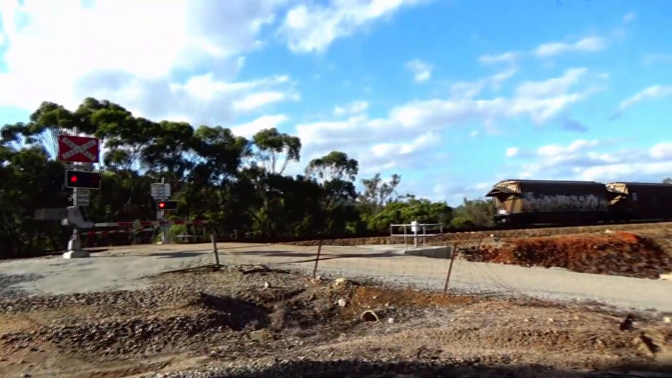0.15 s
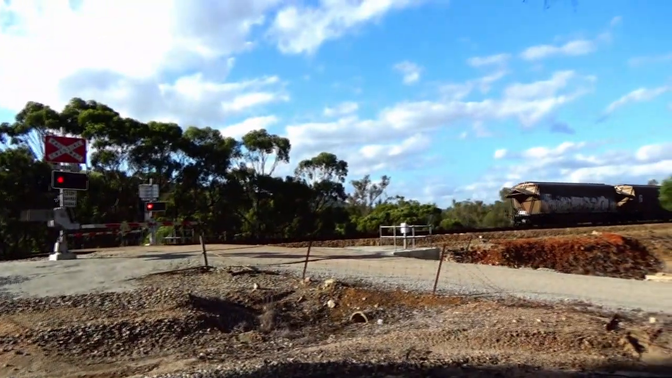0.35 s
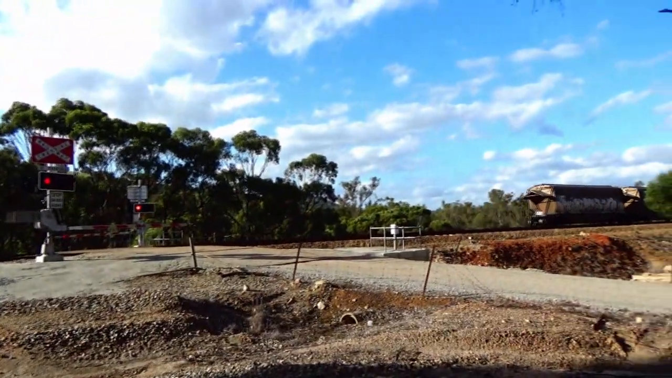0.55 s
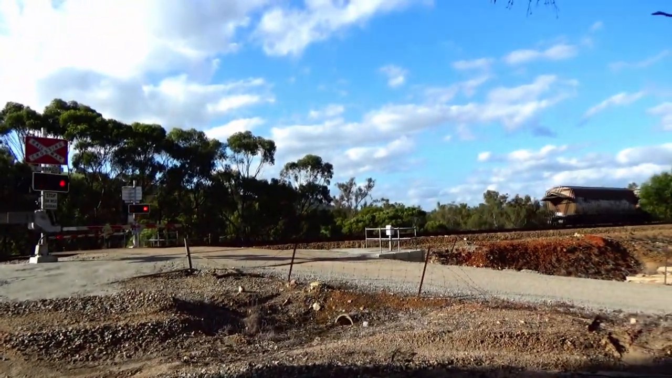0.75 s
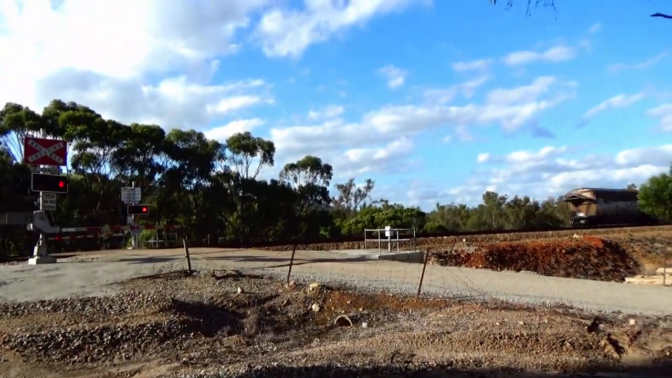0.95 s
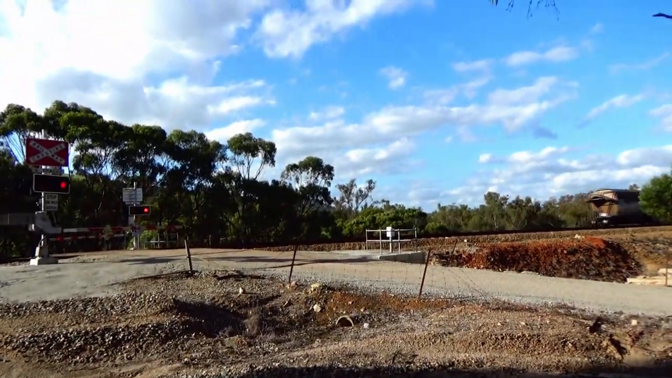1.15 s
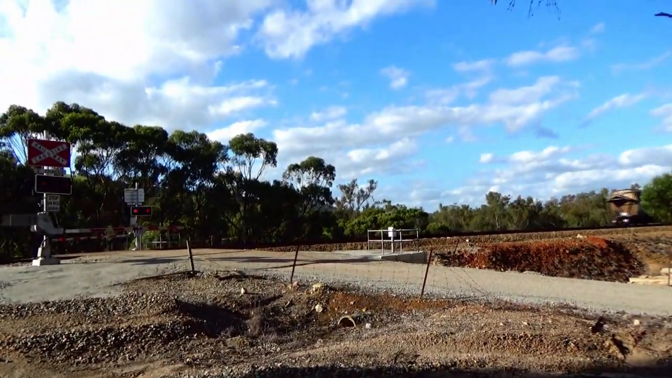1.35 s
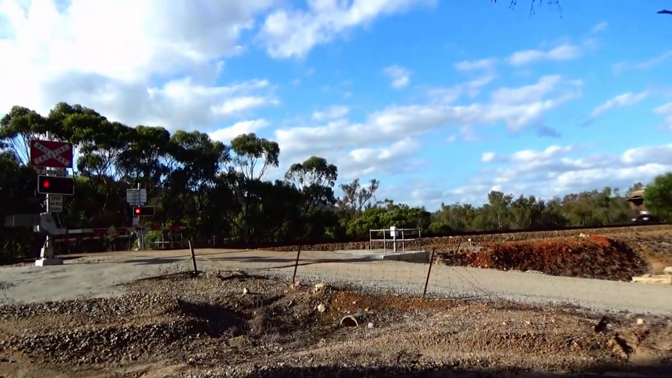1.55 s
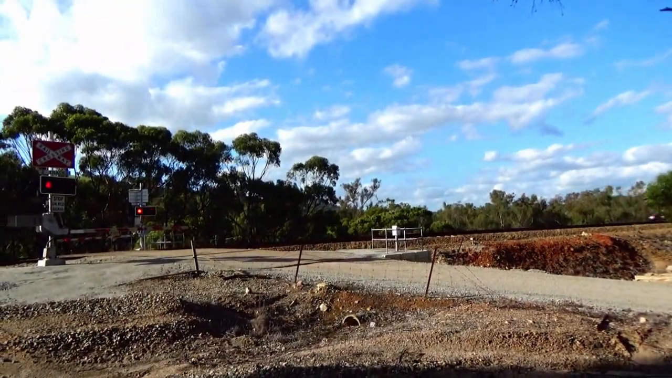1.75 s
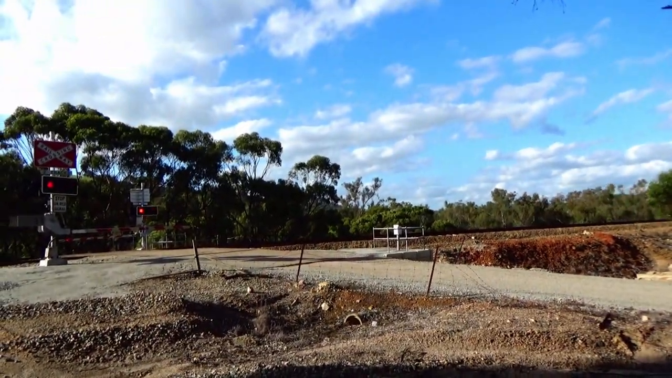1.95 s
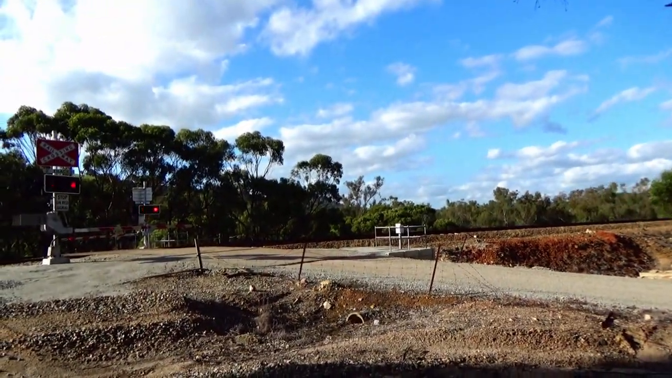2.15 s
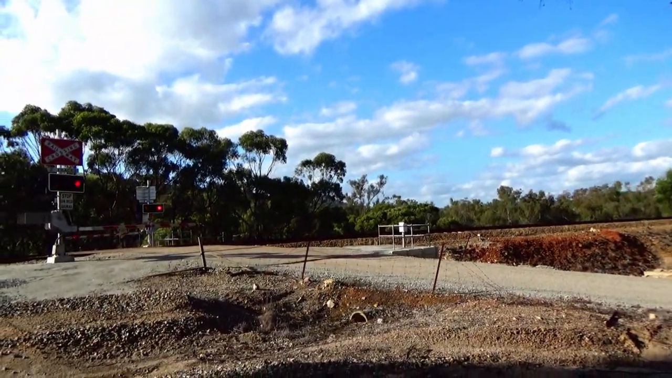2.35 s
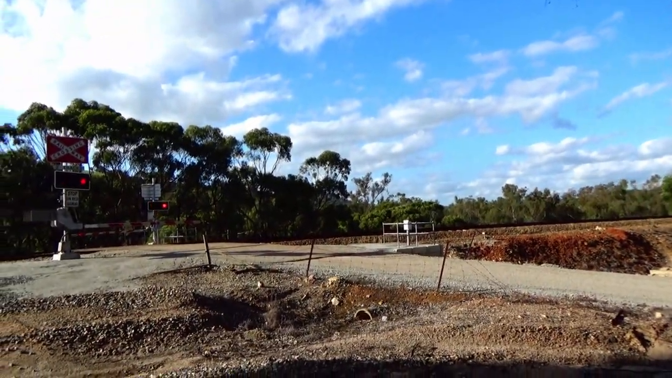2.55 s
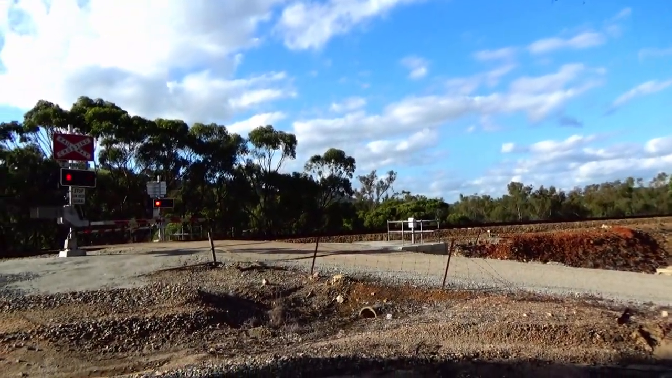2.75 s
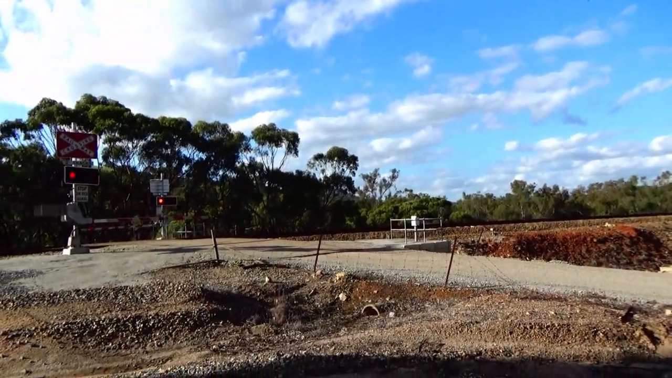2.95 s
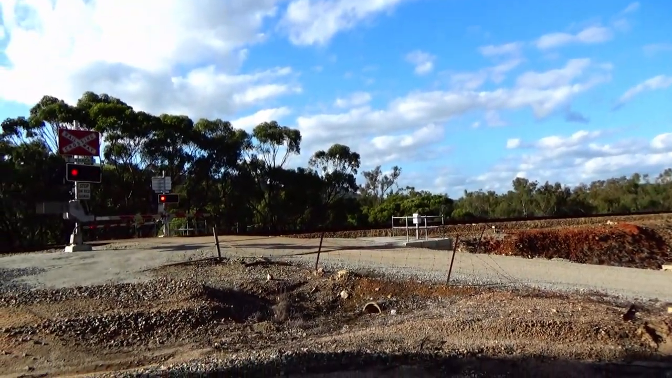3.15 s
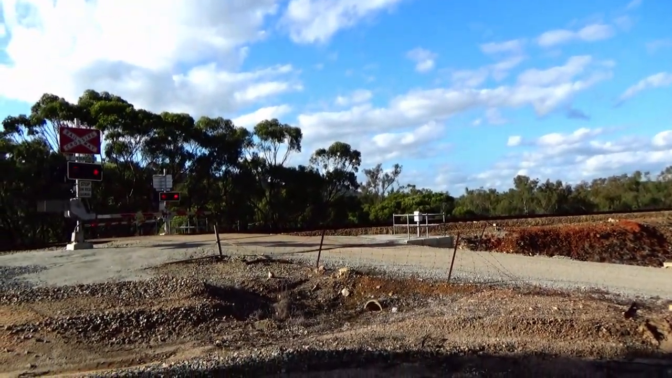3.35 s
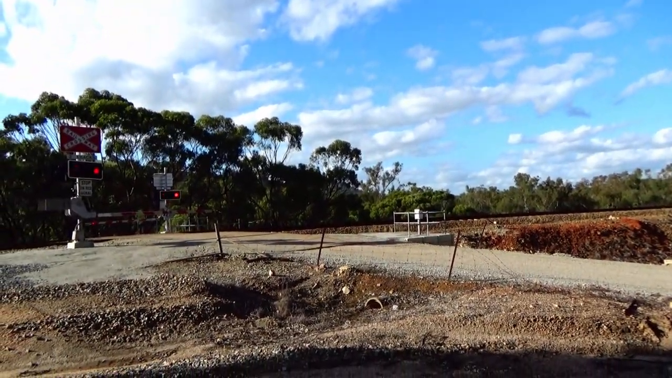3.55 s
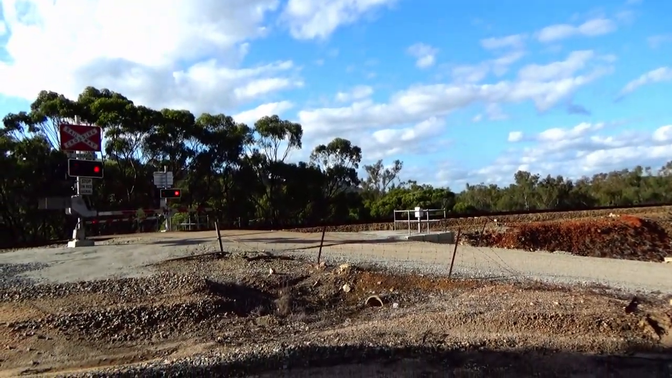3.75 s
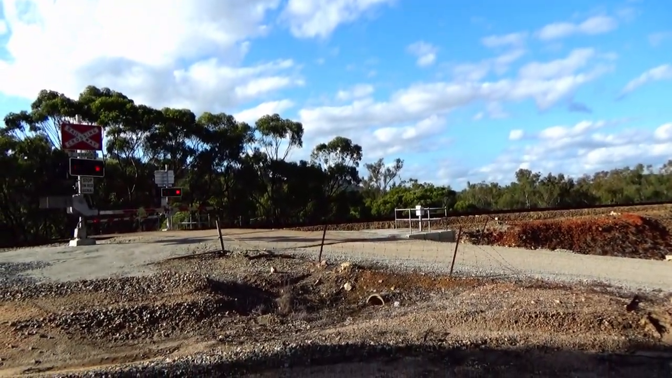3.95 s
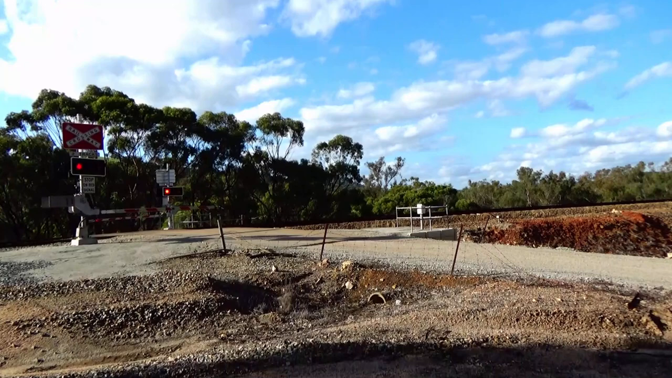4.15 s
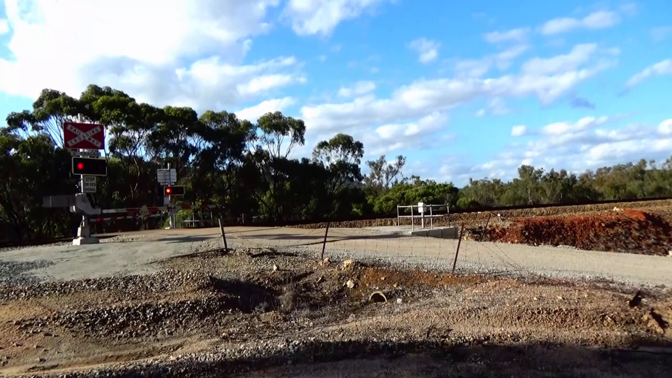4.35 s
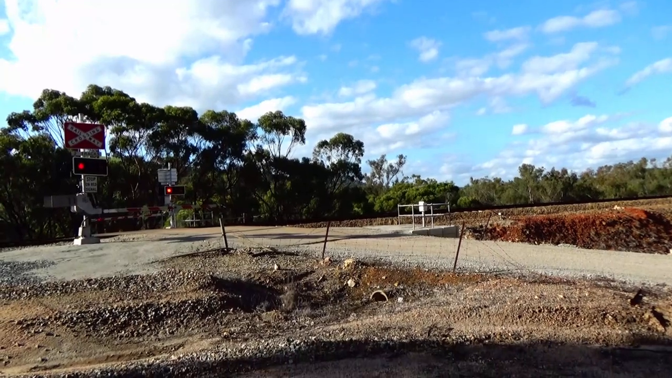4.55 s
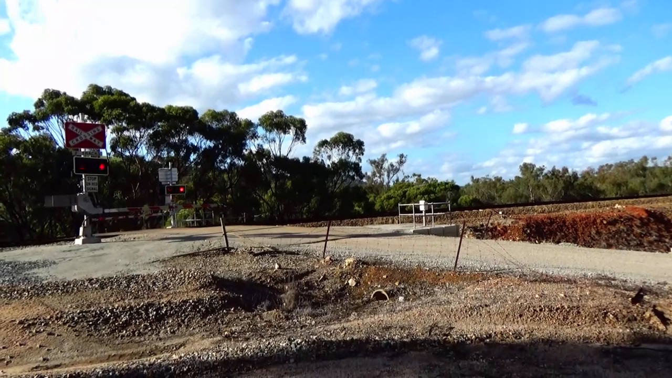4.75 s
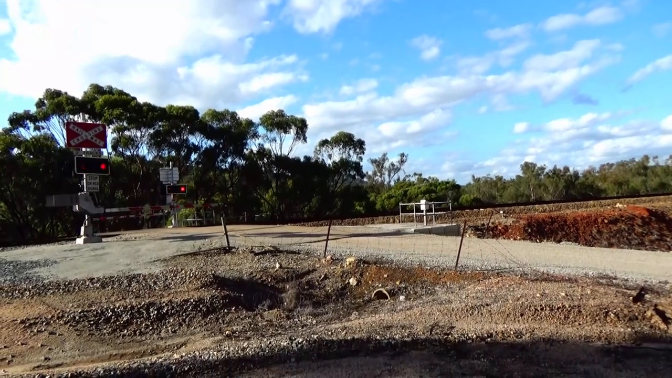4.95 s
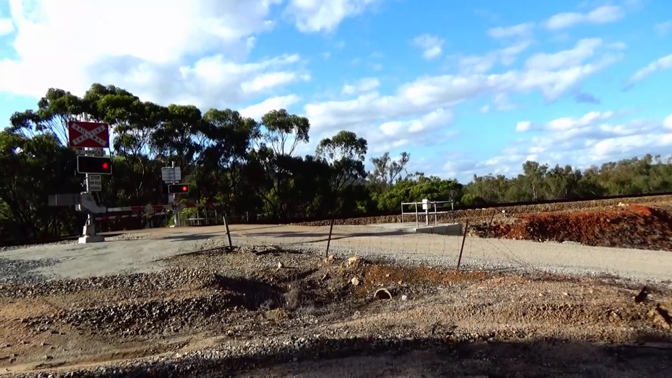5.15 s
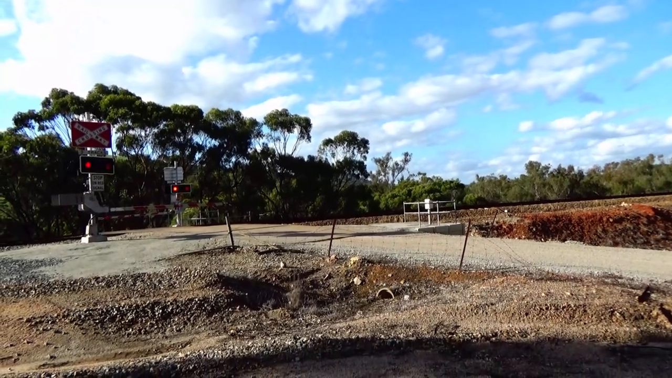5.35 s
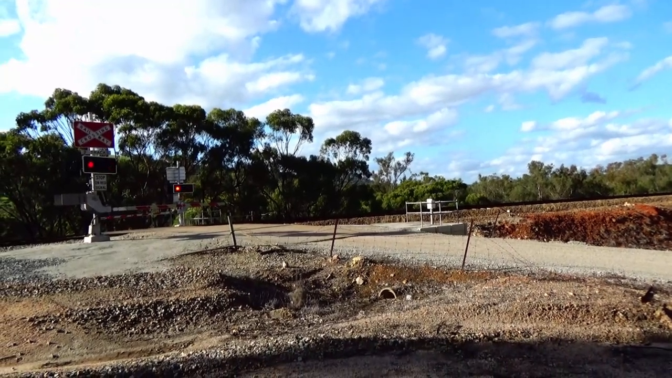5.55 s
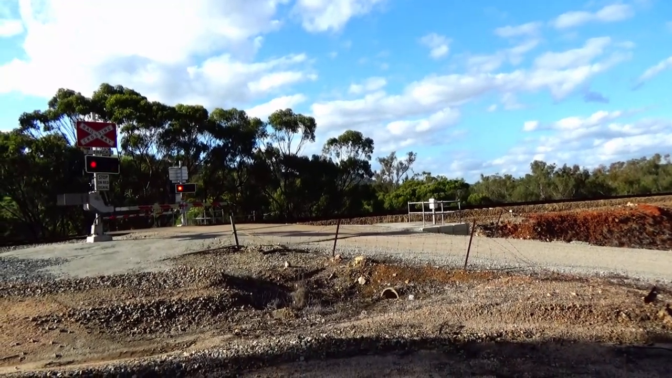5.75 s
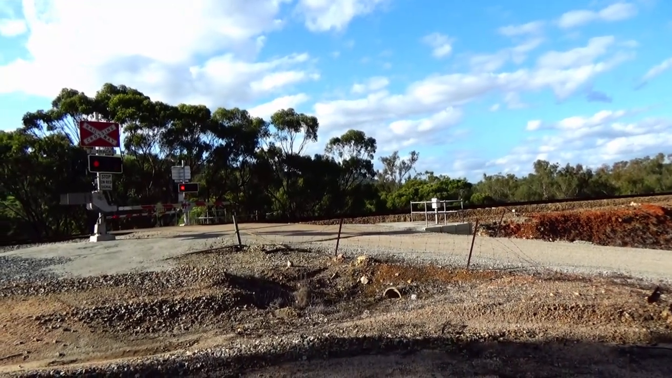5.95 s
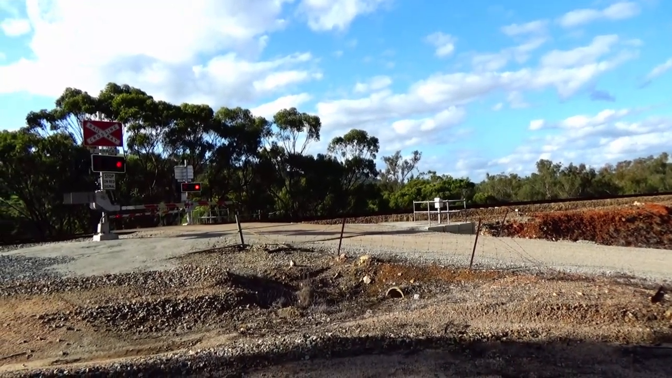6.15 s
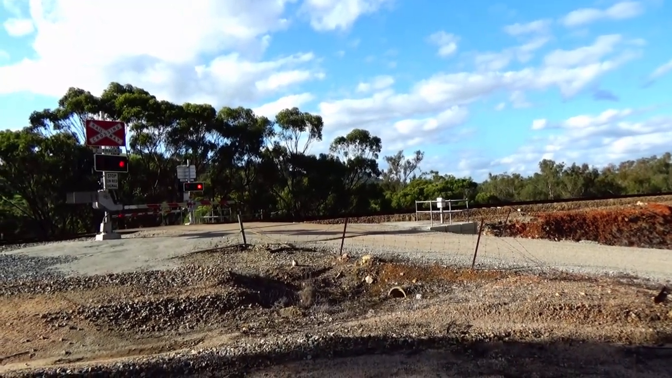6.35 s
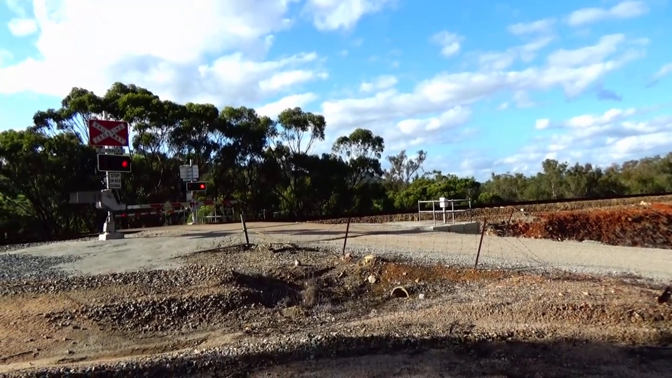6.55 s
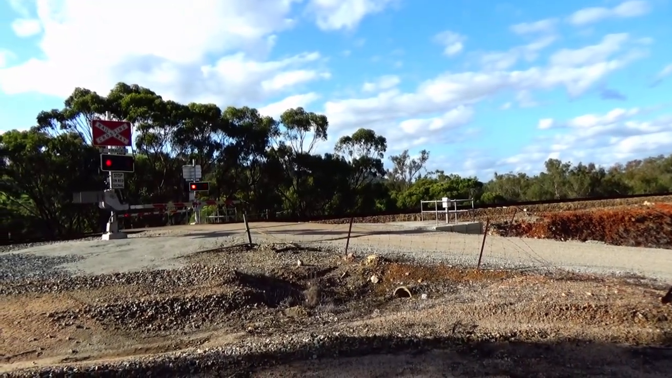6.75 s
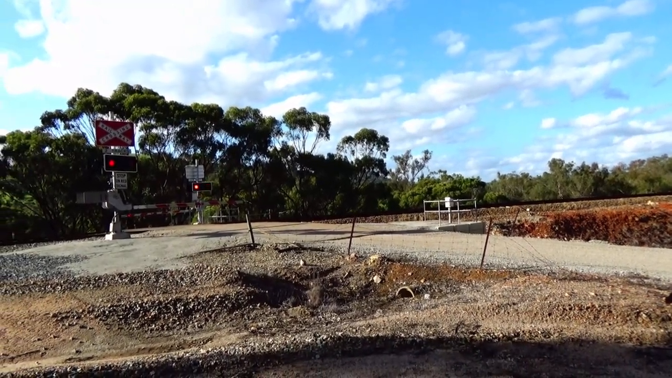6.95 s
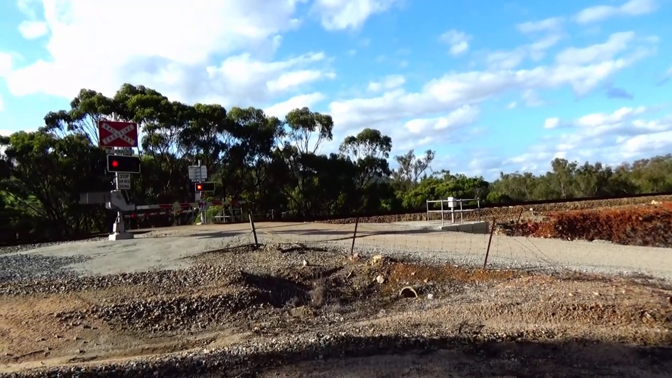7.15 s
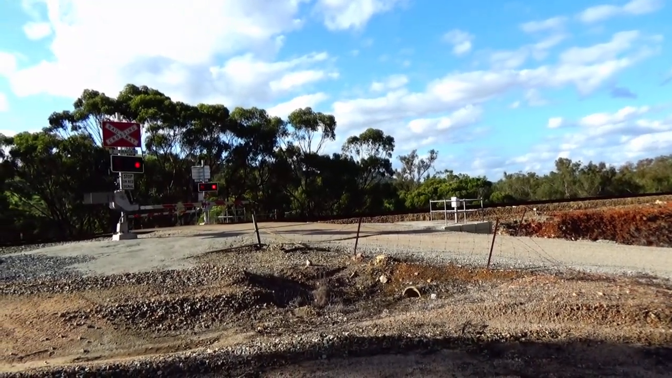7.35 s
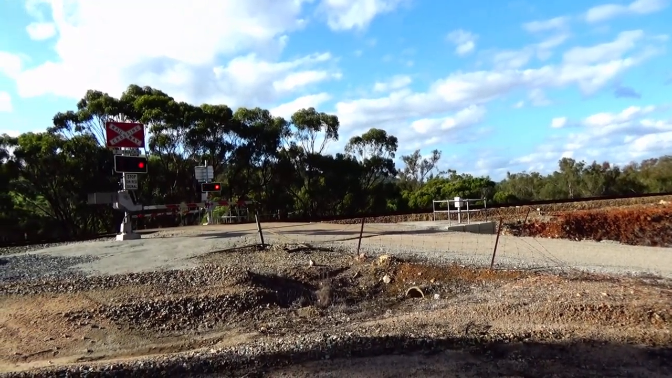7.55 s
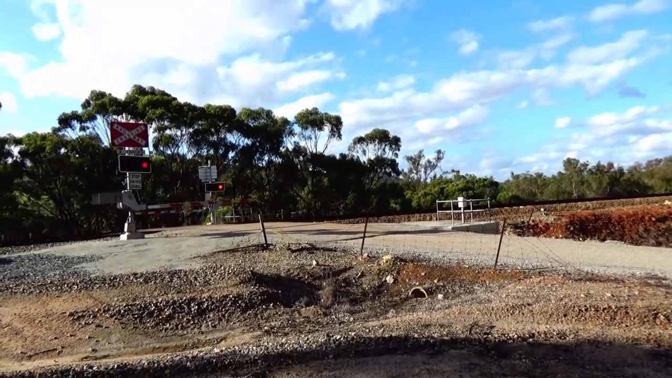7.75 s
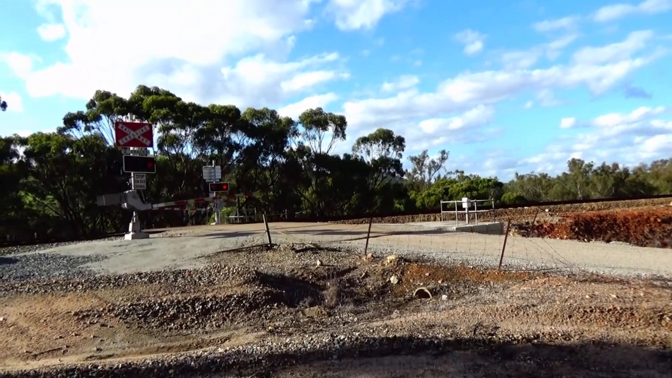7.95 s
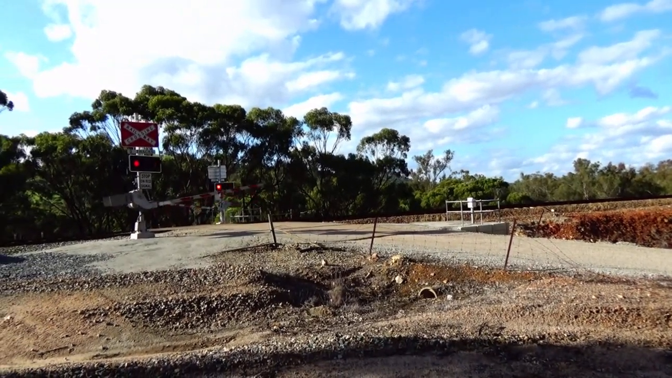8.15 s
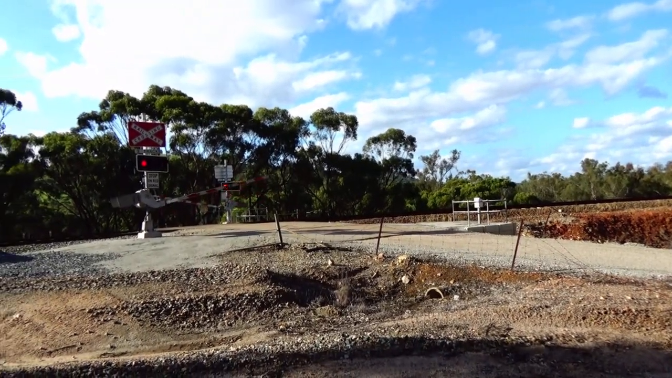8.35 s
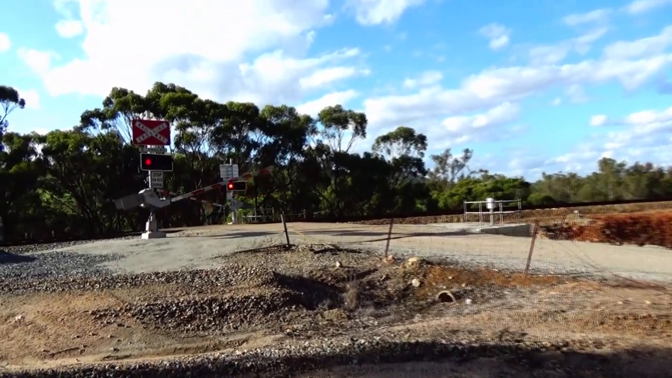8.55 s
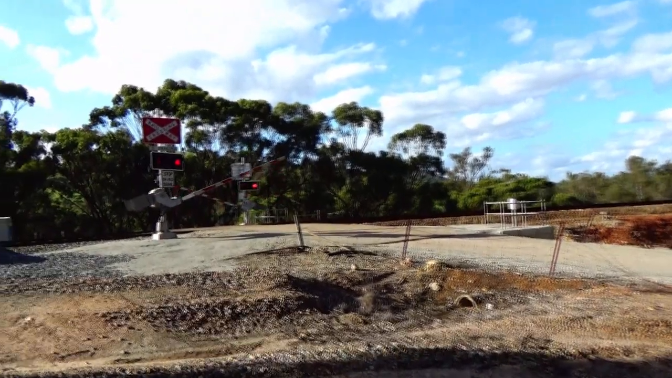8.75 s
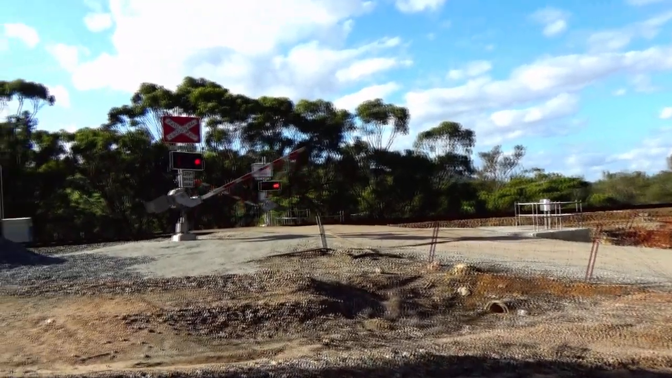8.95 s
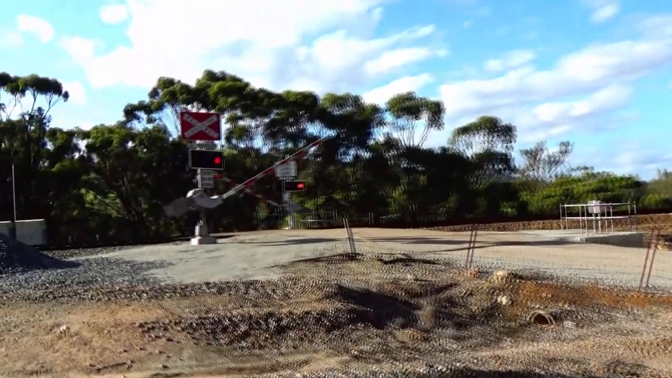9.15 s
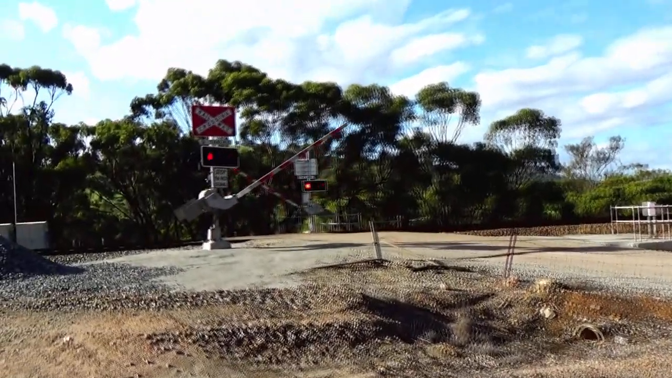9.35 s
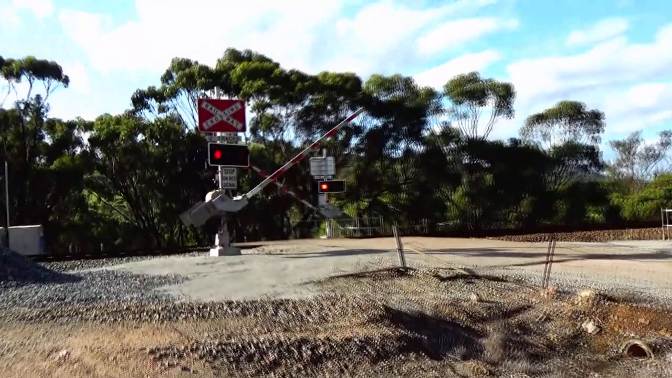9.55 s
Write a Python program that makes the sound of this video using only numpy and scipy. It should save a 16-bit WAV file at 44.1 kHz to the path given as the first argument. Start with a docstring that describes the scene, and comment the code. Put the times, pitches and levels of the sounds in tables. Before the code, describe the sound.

A departing train starts close and harsh, with dense metallic hiss, wheel ring and many thin squeaks. The hiss falls away as the wagons disappear, while two high squeals flare irregularly and the rails keep singing, ever fainter, over low rumble and hum. A small double tick comes midway, with slight wind puffs later. Finally a sharp steel clank and scattered ticks of the rising boom stand out against the quiet open countryside, heard in stereo from the roadside.

```python
"""A freight train's last wagons roll away from a country level crossing on a curve: drifting shaped noise
gives rumble, wheel ring in broad bands, a whine lingering in the rails and flange hiss.
Wavering sines make two lasting squeals, short squeaks and a low hum.
Later the crossing boom clanks free and ticks as it lifts: noise bursts through gear resonances.
Wind noise and still air lie beneath."""
import sys
import numpy as np
from scipy import signal
from scipy.io import wavfile
from scipy.ndimage import uniform_filter1d

SR = 44100
rng = np.random.default_rng(int(sys.argv[2]) if len(sys.argv) > 2 else 0)


def to_wav(s):
    """Save 16-bit WAV."""
    ch = np.atleast_2d(s).T  # columns
    pcm = np.round(np.clip(ch, -1, 1) * 32767)  # PCM
    wavfile.write(sys.argv[1], SR, pcm.astype(np.int16))


N = 422911
FRAME, HOP = 2048, 512  # samples
SIDE = np.array([[.5], [-.5]])  # left and right halves of a difference

# direction of the train: time_s, left_minus_right_db
BEARING = [(0, -1.5), (2.1, -3.9), (6.1, -4.5), (6.6, -3), (9.1, -3.5), (9.59, -.5)]
# phase between the microphone ports: freq_hz, left_lead_rad
LEAD = [(0, -0.53), (1030, 0.43), (1290, 0.99), (1890, 0.77), (2840, 0.69), (3100, 0.65), (8610, 0.097),
        (11400, -0.086), (15200, -0.0)]
# how far each frequency follows a left-right tilt: freq_hz, share
LEAN = [(100, 0), (400, 0.19), (1000, 0.44), (4400, 0.76), (8000, 0.73), (14000, 0)]


def gain_of(db):
    """Decibels to gain."""
    return 10 ** (np.asarray(db) / 20)


def evened(x):
    """Scales to rms 1."""
    return x / np.sqrt(np.mean(x ** 2) + 1e-20)


def read(points, hz):
    """Reads a table on a log-frequency axis."""
    f, value = np.transpose(points)
    return np.interp(np.log(hz + 1), np.log(f + 1), value)


def add(mix, start_s, sound):
    """Adds a sound into the mix at a time."""
    part = mix[..., round(start_s * SR):][..., :sound.shape[-1]]
    part += sound[..., :part.shape[-1]]


def unit_curve(points, hz):
    """Power spectrum drawn by a dB table, total power 1."""
    power = gain_of(2 * read(points, hz))
    return power / power.sum()


def humps(modes, hz):
    """Power spectrum of steep resonances, total power 1."""
    power = sum(gain_of(2 * db) / (1 + (2 * (hz - f) / width) ** 2) ** 2 for f, width, db in modes)
    return power / power.sum()


def drift(count, smooth_s):
    """Twice-smoothed noise of rms 1."""
    size = max(int(smooth_s * SR), 1)
    once = uniform_filter1d(rng.standard_normal(count), size)
    return evened(uniform_filter1d(once, size))


def ring(x, hz, width_hz):
    """One steep resonance of peak gain 1: a peak filter run twice."""
    b, a = signal.iirpeak(hz, hz / width_hz, SR)
    return signal.lfilter(b, a, signal.lfilter(b, a, x))


def ports(x, hz, tilt_db):
    """Left and right copies of one complex tone, as the two microphone ports hear it."""
    phase = np.exp(1j * SIDE * read(LEAD, hz))
    return (x * phase * gain_of(SIDE * tilt_db * read(LEAN, hz))).real


def train_power(t, hz):
    """Rough wheels on rough rails: four noise layers fading at their own pace, with random drifts."""
    # receding train, before drifts: time_s, rumble_db, wheel_ring_db, rail_whine_db, flange_hiss_db
    train = [(0.0, -27, -18.5, -19, -16), (0.6, -28.5, -20, -19.5, -19), (0.96, -30.5, -21.5, -15, -22),
             (1.28, -30.5, -25, -15, -29.5), (1.7, -32.5, -26, -17, -33), (2.2, -31.5, -26.5, -19, -34.5),
             (3.0, -31.5, -27, -21.5, -36), (3.76, -31, -27, -23, -38), (4.5, -31, -28.5, -23, -39.5),
             (5.1, -33, -30, -28, -42), (6.14, -35, -33.5, -31.5, -45.5), (6.8, -35.5, -35, -34.5, -47),
             (7.6, -37.5, -35, -34, -47.5), (8.0, -37, -36, -37.5, -47.5), (9.0, -36.5, -39.5, -41, -51),
             (9.59, -36, -41.5, -42, -51.5)]
    # rolling rumble: freq_hz, density_db_per_hz
    rumble = [(88, -41), (150, -9.5), (221, 0.5), (306, -5), (416, -0.5), (520, -6.5), (668, -2), (900, 0),
              (1500, -6), (1950, -14), (3300, -120)]
    # broad bands of crowded wheel modes: freq_hz, width_hz, level_db
    wheel_ring = [(1997, 390, -3), (2710, 274, -3), (3690, 520, -4.5), (4670, 530, 0.5), (1560, 480, -11.5),
                  (3050, 1900, -9.5)]
    # whine in the rails: freq_hz, width_hz, level_db
    whine = [(5870, 447, 3), (5400, 110, -4), (5590, 180, 3.5), (5880, 1600, -15.5)]
    # flange hiss in sight: freq_hz, width_hz, level_db
    hiss = [(6840, 400, 0), (7840, 550, -2), (8730, 470, -2.5), (9620, 420, -4), (10090, 220, -6),
            (10200, 350, -13), (10860, 380, -5.5), (11600, 400, -8), (12170, 410, -9.5), (13650, 280, -17),
            (7340, 1900, -6), (9120, 500, -12), (12950, 870, -21), (13900, 1100, -42)]
    # hiss scattered by trees and banks, bands smeared: freq_hz, density_db_per_hz
    far_hiss = [(3760, -33), (6400, -4.5), (6550, -3), (8430, -9), (11000, -15.5), (12300, -11.5),
                (14000, -28.5)]
    hidden_s, hiding_s = 1.1, .6  # last wagon starts to go out of sight; time constant

    s, *columns = np.transpose(train)
    *levels_db, hiss_db = [np.interp(t, s, c) for c in columns]
    shapes = [unit_curve(rumble, hz), humps(wheel_ring, hz), humps(whine, hz)]
    power = sum(np.outer(shape, gain_of(2 * db)) for shape, db in zip(shapes, levels_db))
    seen = np.minimum(np.exp((hidden_s - t) / hiding_s), 1)
    hiss_shape = np.outer(humps(hiss, hz), seen) + np.outer(unit_curve(far_hiss, hz), 1 - seen)
    power += hiss_shape * gain_of(2 * hiss_db)

    # groups of modes swell and die: smoothed over 12 bins, 6 frames
    patches = uniform_filter1d(rng.standard_normal(power.shape), 12, 0)
    patches = evened(uniform_filter1d(patches, 6, 1))
    # single sharp modes ring on: smoothed over 20 frames
    streaks = evened(uniform_filter1d(rng.standard_normal(power.shape), 20, 1))
    # the wagons shake as one
    jolts = evened(uniform_filter1d(rng.standard_normal(len(t)), 3))
    return power * gain_of(2 * (0.61 * patches + 2.29 * streaks + 0.41 * jolts))


def tone(t, hz, db, waver_hz, flutter_db, smooth_s):
    """A self-excited mode: a sine whose pitch wavers and whose level flutters."""
    turns = np.cumsum(hz + waver_hz * drift(len(t), smooth_s)) / SR + rng.random()
    level = np.sqrt(2) * gain_of(db + flutter_db * drift(len(t), smooth_s))
    tilt_db = np.interp(t, *np.transpose(BEARING))
    return ports(level * np.exp(2j * np.pi * turns), np.mean(hz), tilt_db)


def lasting_squeals():
    """Two wheel modes that sing faintly, flare up and settle in pitch."""
    # the two modes: settled_hz, early_excess_hz, settling_s, first_heard_s
    wheels = [(5704, 82, 2.2, .75), (4485, 30, 1.3, 0)]
    # per mode: faint_db at 0 s, fade_db_per_s, flares of (middle_s, length_s, level_db)
    squeals = [(-22, -3.5, [(.8, .1, -24), (.95, 0.085, -13), (1.14, 0.15, -13), (1.33, 0.028, -9),
               (1.49, .1, -13), (1.62, 0.099, -13.5), (1.8, 0.067, -15), (2.03, 0.31, -21),
               (2.3, 0.13, -25.5), (2.57, 0.22, -25.5), (2.76, .08, -29), (2.97, 0.035, -22.5),
               (3.14, .08, -23), (3.27, 0.038, -27), (3.47, 0.13, -21.5), (3.67, 0.074, -24),
               (3.82, 0.048, -23.5), (3.99, 0.11, -24.5), (4.5, 0.18, -24), (4.93, 0.074, -25),
               (5.06, 0.12, -33), (5.33, 0.16, -35.5), (5.7, .25, -37.5), (6.03, 0.19, -31),
               (6.45, 0.091, -35), (6.71, 0.11, -36.5), (7.0, 0.072, -41), (7.44, 0.1, -33),
               (7.68, 0.15, -36.5), (8.05, 0.18, -41), (8.6, 0.27, -38), (8.84, .1, -42),
               (9.12, 0.11, -40)]), (-33, -3.6, [(.08, 0.22, -29.5), (.31, 0.17, -18.5), (.55, .25, -24.5),
               (.94, .08, -28.5), (1.2, .1, -37), (2.0, .16, -27), (2.14, 0.066, -30), (2.27, 0.12, -29),
               (2.55, .08, -35), (2.8, 0.1, -29.5), (3.1, .2, -31.5), (3.33, .1, -33), (3.48, .1, -33),
               (3.87, 0.17, -34), (4.08, .15, -35), (4.5, .3, -31), (4.95, .1, -34.5), (5.2, 0.2, -31.5),
               (5.4, .08, -33), (5.56, .14, -35.5), (6.2, 0.24, -38), (6.65, 0.085, -51),
               (6.87, 0.33, -39.5), (7.25, 0.17, -40), (7.45, .18, -42.5), (8.06, .06, -48)])]
    squareness = 2.1  # flare shape: 2 is a bell, more is flat-topped
    t = np.arange(N) / SR
    out = np.zeros((2, N))
    for (hz, excess_hz, settle_s, first_s), (faint_db, db_per_s, flares) in zip(wheels, squeals):
        power = gain_of(2 * (faint_db + db_per_s * t)) * (t >= first_s)
        for middle_s, length_s, db in flares:
            near = t[max(int((middle_s - length_s) * SR), 0):int((middle_s + length_s) * SR)]
            shape = np.exp(-abs(2 * (near - middle_s) / length_s) ** squareness)
            add(power, near[0], gain_of(2 * db) * shape)
        pitch_hz = hz + excess_hz * np.exp(-t / settle_s)
        out += np.sqrt(power) * tone(t, pitch_hz, 0, 6, 2.5, .013)
    return out


def squeaks():
    """Tones that come and go as single wheels stick and slip."""
    # before flutter: start_s, end_s, pitch_hz, level_db
    squeak_tones = [(0, 0.15, 5841, -29), (0, 0.15, 6735, -23), (0, 0.15, 8899, -28), (0, 0.3, 7736, -23),
                    (0, 0.3, 10051, -37), (0, 0.3, 11666, -37), (0, 0.4, 12317, -39), (0, 0.45, 8737, -31),
                    (0, 0.45, 11090, -38), (0, 0.6, 1960, -36), (0, 0.72, 6546, -27), (0, 0.8, 13652, -49),
                    (0.2, 0.5, 6697, -27), (0.2, 1.14, 9670, -40), (0.72, 1.0, 5669, -21),
                    (0.5, 1.05, 2681, -37), (0.5, 1.14, 8667, -32), (0.57, 0.74, 4700, -25),
                    (0.44, 0.68, 5690, -28), (0.58, 0.9, 7800, -32), (0.7, 1.1, 6783, -28),
                    (0.72, 1.14, 7660, -34), (1.2, 1.55, 8720, -42), (1.25, 1.6, 7650, -42),
                    (1.1, 2.6, 12200, -55), (1.7, 3.6, 11849, -54), (2.4, 3.2, 5448, -40),
                    (2.5, 3.4, 13415, -55), (2.2, 5.3, 12360, -55), (3.5, 4.6, 12656, -57),
                    (3.5, 5.9, 13421, -62), (4.15, 5.8, 11843, -52), (4.7, 5.6, 5453, -43),
                    (5.3, 5.7, 2681, -47), (5.55, 5.9, 12452, -60), (5.86, 5.98, 2412, -44),
                    (6.2, 7.5, 11870, -65), (6.26, 6.34, 2900, -44), (7.1, 8.7, 12890, -68),
                    (8.2, 9.3, 12662, -66), (9.26, 9.3, 1950, -41)]
    out = np.zeros((2, N))
    for start_s, end_s, hz, db in squeak_tones:
        t = np.arange(start_s, end_s, 1 / SR)
        ramp_s = .2 * (end_s - start_s)
        rise = (t - start_s) / ramp_s + (start_s == 0)  # those at zero are already sounding
        swell = np.minimum(np.minimum(rise, (end_s - t) / ramp_s), 1)
        add(out, start_s, tone(t, hz * np.ones(len(t)), db, 10, 3.5, .02) * swell)
    return out


def hum():
    """Wavering low hum of the rolling wagons: a tone and its octave."""
    # before flutter: time_s, level_db, octave_level_db
    hum_levels = [(0, -42, -59), (.3, -39, -56), (1.3, -38, -45), (1.7, -42, -49.5), (2.4, -39, -40),
                  (2.8, -48, -46), (3.6, -47, -48), (4.1, -54, -44.5), (4.8, -59, -49), (5.8, -58, -52),
                  (6.4, -52, -62), (9.6, -63, -75)]
    hum_hz = 218
    t = np.arange(N) / SR
    out = np.zeros((2, N))
    s, *levels_db = np.transpose(hum_levels)
    for k, db in enumerate(levels_db):
        out += tone(t, (k + 1) * hum_hz * np.ones(N), np.interp(t, s, db), 4.43, 2.95, 0.041)
    return out


def burst(length_s, t60_s, rise_s, blow=0):
    """Noise with a linear rise and an exponential fall; a one-sample blow lands at the top of the rise."""
    t = np.arange(int(length_s * SR)) / SR
    x = rng.standard_normal(len(t)) * np.minimum(t / rise_s, 1) * gain_of(-60 * t / t60_s)
    return x + blow * (np.arange(len(t)) == int(rise_s * SR))


def boom_clanks():
    """Boom gear clanks: a blow of steel on steel and its rattle excite the gear's modes."""
    # start_s, peak_db, left_minus_right_db, rattle_t60_s
    clanks = [(8.044, -13.5, 3, 0.091), (8.055, -14.5, 2.5, 0.13), (8.104, -17.5, 1.5, 0.17),
              (9.263, -31, .5, 0.11)]
    # gear modes: freq_hz, width_hz, level_db
    gear = [(760, 110, -0.5), (1060, 120, 3), (1183, 56, 2), (1846, 66, -1), (2130, 870, 11.5),
            (2280, 56, -4), (2560, 81, 0), (2770, 100, 4), (3050, 690, 0), (4830, 100, 1), (4900, 530, 1),
            (6200, 780, -2), (8400, 860, -4), (9250, 830, -7)]
    blow = 6  # first impact, against the rattle noise
    out = np.zeros((2, N))
    for s, db, tilt_db, t60_s in clanks:
        direct, echo = [burst(.25, t60_s, 0.0019, blow) for _ in range(2)]
        # echoes off the ground differ left and right
        x = np.array([direct + 0.21 * echo, direct - 0.36 * echo])
        x = sum(gain_of(mode_db) * ring(x, hz, width) / np.sqrt(width) for hz, width, mode_db in gear)
        add(out, s - .002, gain_of(db + SIDE * tilt_db) * x / abs(x.mean(0)).max())
    return out


def boom_ticks():
    """Dry ticks and small knocks: very short noise through broad resonances."""
    # start_s, peak_db, left_minus_right_db, treble_db (modes above 6 kHz)
    ticks = [(5.326, -20, -2.5, -25), (5.347, -17, -2, -25), (6.75, -32, -2, 5), (8.737, -19.5, -1, -3),
             (9.043, -19, -1, -6), (9.109, -24, -1.5, -22), (9.204, -28, -1, -22), (9.344, -27, 2, -15),
             (9.369, -24, 1, -25)]
    # freq_hz, width_hz, level_db
    tick_modes = [(1000, 800, 1), (1600, 800, 2), (3000, 1400, -3), (4800, 800, -3), (8300, 1100, -3),
                  (9800, 900, -5), (11300, 1200, -11)]
    out = np.zeros((2, N))
    for s, db, tilt_db, treble_db in ticks:
        dry_tick = burst(.06, .027, .001)
        x = 0
        for hz, width, mode_db in tick_modes:
            x = x + gain_of(mode_db + treble_db * (hz > 6000)) * ring(dry_tick, hz, width)
        add(out, s - .001, gain_of(db + SIDE * tilt_db) * x / abs(x).max())
    return out


def wind_puffs():
    """Puffs of wind on the microphone: low, soft noise bursts."""
    # start_s, peak_db
    puffs = [(6.554, -33), (6.626, -31.5), (6.706, -30), (6.786, -27), (6.84, -36)]
    out = np.zeros(N)
    for s, db in puffs:
        x = ring(burst(.2, 0.15, 0.0061), 214, 140)
        add(out, s - .01, gain_of(db) * x / abs(x).max())
    return out


def wind_power(t, hz):
    """Light wind: low noise bands whose level comes in random lumps."""
    # before lumps: time_s, level_db
    gusts = [(0, -47.5), (1.3, -52), (2.1, -44.5), (2.8, -48), (3.6, -53), (4.1, -49.5), (4.8, -57),
             (5.5, -53), (6.1, -59), (6.78, -49), (7.13, -53), (8.6, -63.5), (9.59, -61)]
    # freq_hz, width_hz, level_db
    gust_bands = [(85, 57, -1), (129, 31, -6)]
    lumps_db = 3. * evened(uniform_filter1d(rng.standard_normal(len(t)), 6))
    return np.outer(humps(gust_bands, hz), gain_of(2 * (np.interp(t, *np.transpose(gusts)) + lumps_db)))


def air_power(hz):
    """Still air: steady noise, mostly treble."""
    # freq_hz, density_db_per_hz
    air = [(6000, -30), (10000, -3), (12500, -2), (15800, -4.5)]
    return (unit_curve(air, hz) * gain_of(2 * -55))[:, None]


def noise_bed():
    """Train, wind and air noise, drawn frame by frame, partly alike left and right."""
    # freq_hz, left_right_likeness
    likeness = [(60, 0.94), (300, 1), (700, 0.86), (1400, 0.79), (3000, 0.92), (6000, 0.94), (9000, 0.81),
                (14000, 1)]
    t = np.arange(N // HOP + 5) * HOP / SR
    hz = np.fft.rfftfreq(FRAME, 1 / SR)
    power = train_power(t, hz) + wind_power(t, hz) + air_power(hz)
    a, b, c, d = rng.standard_normal((4, *power.shape))
    same = np.clip(read(likeness, hz), -1, 1)[:, None]
    left = a + 1j * b
    shared = left * np.exp(-1j * read(LEAD, hz))[:, None]
    right = same * shared + np.sqrt(1 - same ** 2) * (c + 1j * d)
    tilt_db = np.interp(t, *np.transpose(BEARING))
    lean = gain_of(.5 * np.outer(read(LEAN, hz), tilt_db))
    spectra = np.array([left * lean, right / lean]) * np.sqrt(power)
    noise = signal.istft(spectra, nperseg=FRAME, noverlap=FRAME - HOP)[1][:, :N]
    return gain_of(-0.5) * noise  # trim of the whole bed


def scene():
    """All sources at the microphone."""
    train = noise_bed() + lasting_squeals() + squeaks() + hum()
    return train + boom_clanks() + boom_ticks() + wind_puffs()


def record(dry):
    """The microphone's bass cut, soft overload near full scale, then the band limit."""
    edge_hz, knee, room = 15740, .7, .27
    thin = signal.lfilter(*signal.butter(2, 50, "high", fs=SR), dry)
    over = np.maximum(abs(thin) - knee, 0)
    held = thin - np.sign(thin) * (over - room * np.tanh(over / room))
    low_pass = signal.firwin(1023, edge_hz, window=("kaiser", 9), fs=SR)
    return signal.oaconvolve(held, low_pass[None], "same")


dry = scene()
out = record(dry)
to_wav(out)
```